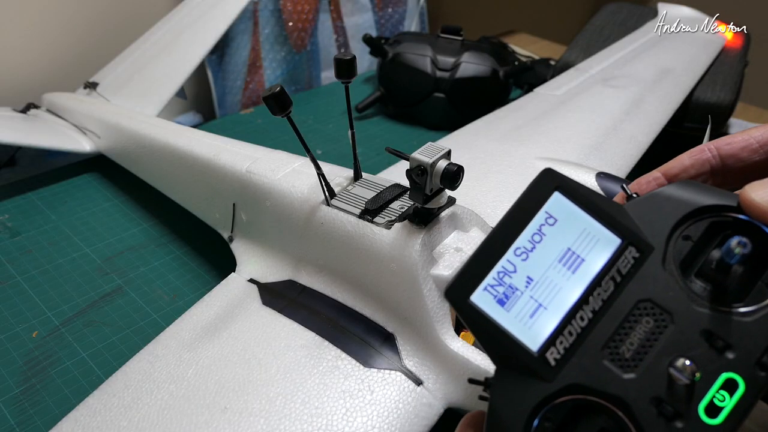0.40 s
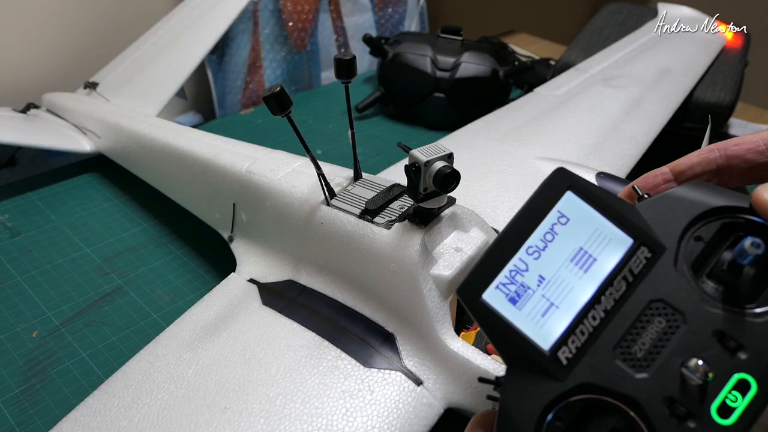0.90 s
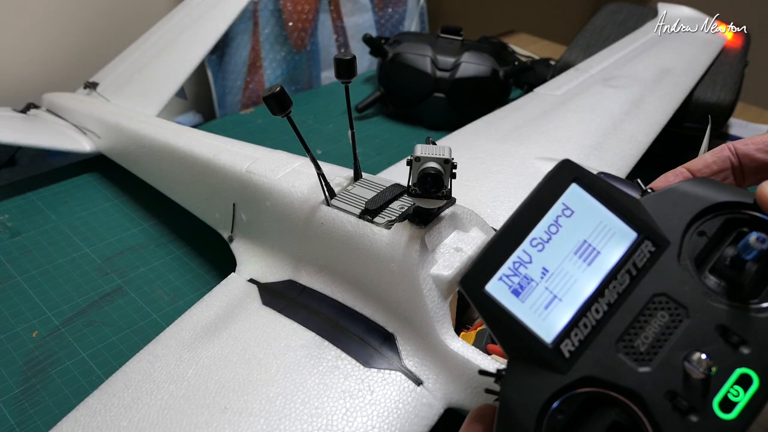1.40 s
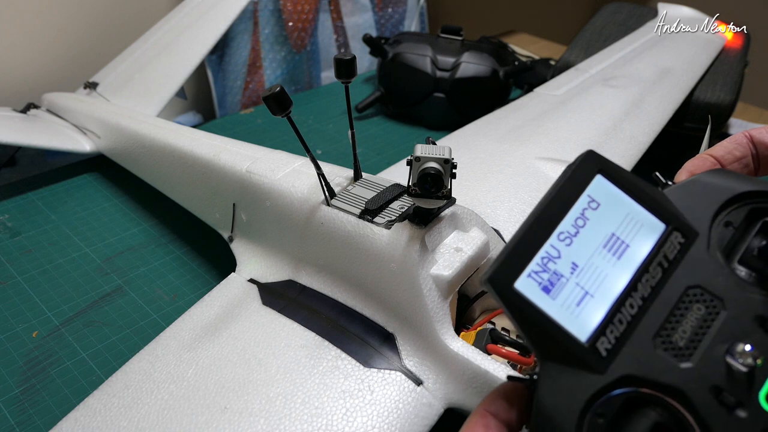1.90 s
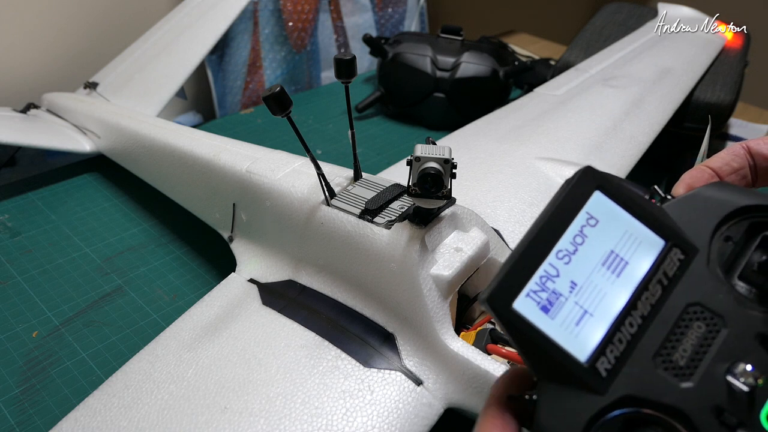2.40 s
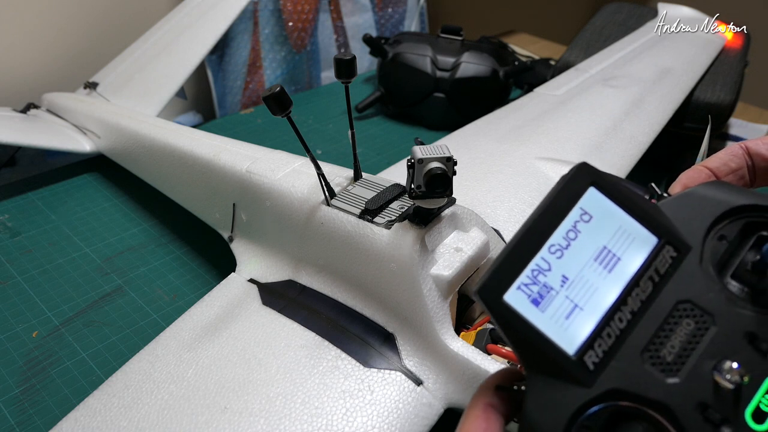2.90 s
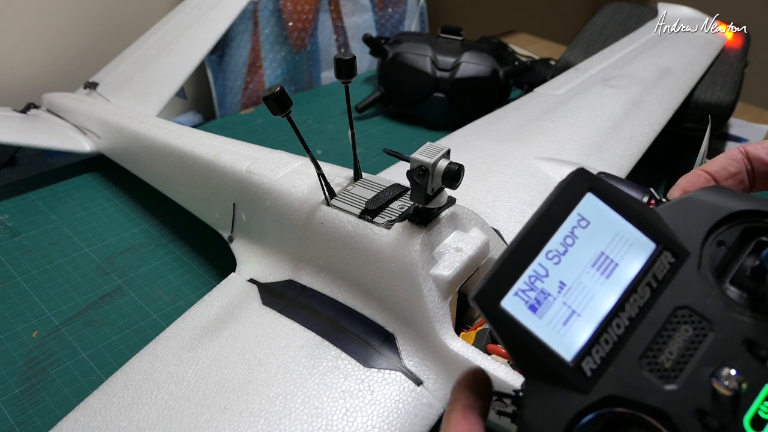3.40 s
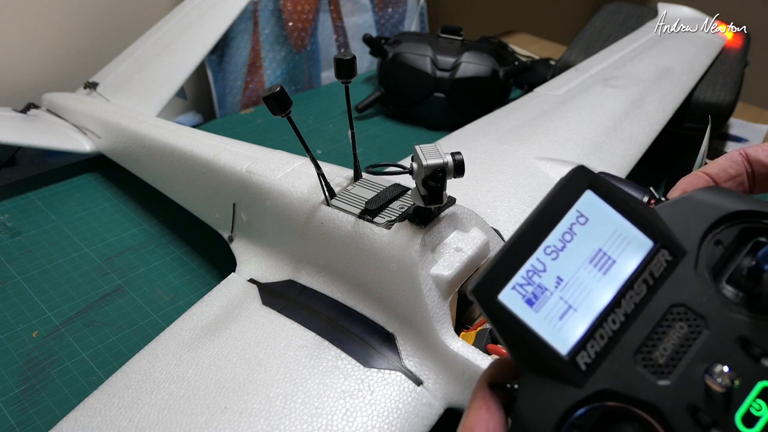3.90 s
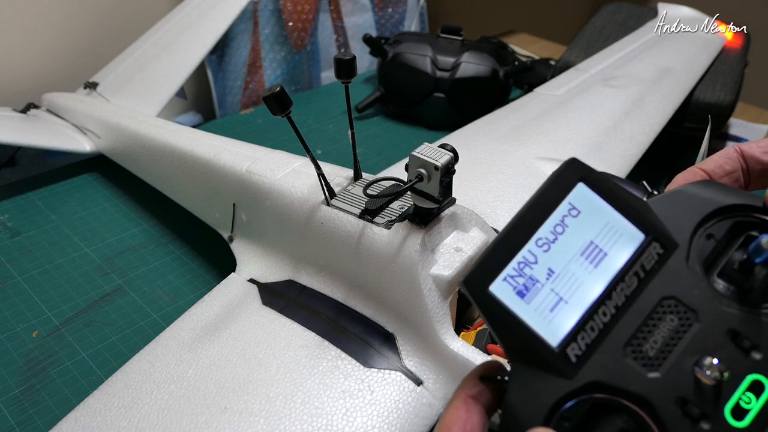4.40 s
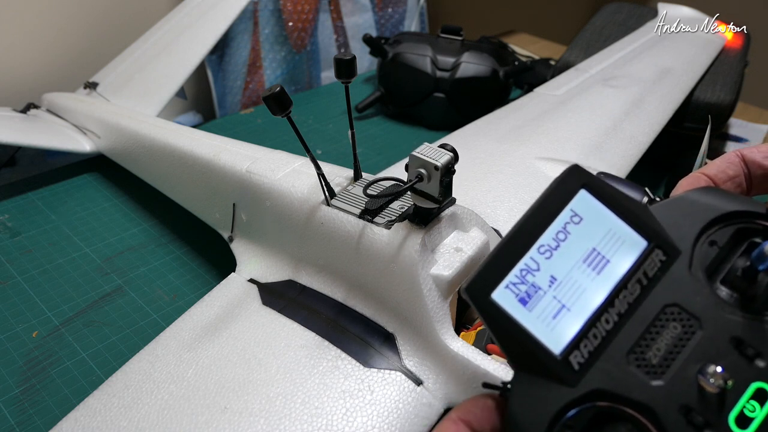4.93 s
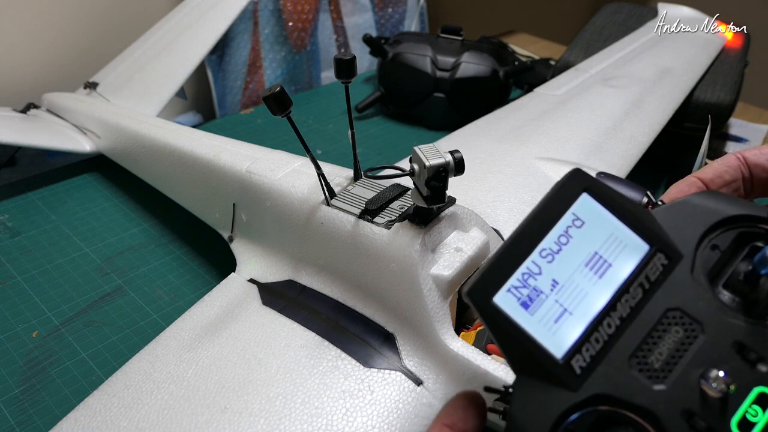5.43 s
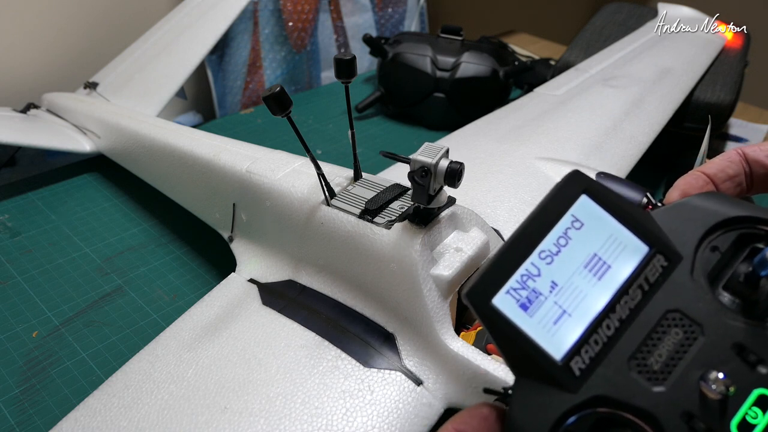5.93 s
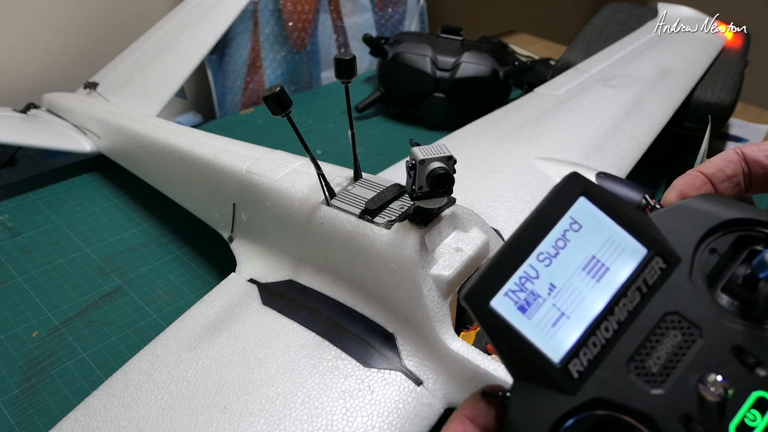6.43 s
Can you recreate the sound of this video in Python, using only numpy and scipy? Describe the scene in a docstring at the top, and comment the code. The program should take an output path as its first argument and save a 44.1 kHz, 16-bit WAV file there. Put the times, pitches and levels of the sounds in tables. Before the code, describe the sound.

Close stereo pickup in a quiet room with a soft wide background noise. A loud, crisp plastic switch click comes first, then a tiny servo gives a brief weak whir. After a pause with faint finger ticks, it runs longer, its buzzing gears growing rattlier and brighter. Another pause, then a third sustained whir that is still running at the end. Short room echoes surround it.

```python
"""Servo pan in a quiet room

A small servo, centred in stereo, pans a camera mount in three runs on a hollow foam body.
Its pinion mesh hums near 900 Hz; loose gears rattle once per motor turn into the case resonances.
A plastic switch snaps once and fingers tick on plastic: noise cracks with short ringing modes.
Dense echoes and a wide filtered background noise lie around it all."""
import sys
import numpy as np
from scipy import signal
from scipy.fft import rfft, irfft
from scipy.io import wavfile

SR = 44100
rng = np.random.default_rng(int(sys.argv[2]) if len(sys.argv) > 2 else 0)


def ratio_of_db(decibels):
    """Turn decibels (scalar or array-like) into linear amplitude factors; 0 dB maps to 1."""
    return 10 ** (np.asarray(decibels, float) / 20)


def bounce(signal):
    """Save signal as a 16-bit WAV file at the path given by the first command-line argument."""
    frames = np.transpose(np.atleast_2d(signal))
    limited = np.clip(frames, -1, 1)
    pcm = np.round(limited * 32767).astype(np.int16)
    wavfile.write(sys.argv[1], SR, pcm)


N = 289296

# drive runs of the servo: start t/s, stop t/s
RUNS = [(0.72, 1.315), (2.714, 4.339), (5.055, 6.6)]
# hardest gear knocks: t/s, relative treble level/dB
KNOCKS = [(0.862, -45), (0.9582, -33), (1.041, -31), (1.083, -28), (1.189, -25), (1.2105, -30),
          (1.2514, -25.5), (1.295, -26), (2.8844, -48), (2.907, -46), (2.941, -34), (3.0418, -35),
          (3.1815, -39), (3.4428, -48), (3.4808, -36), (3.5977, -39), (3.6079, -41), (3.6446, -39),
          (3.652, -28.5), (3.6657, -35), (3.704, -34), (3.715, -40), (3.7247, -40), (3.7618, -35),
          (3.7843, -31), (3.8169, -32), (3.8282, -32), (3.87, -40), (3.8819, -44), (3.9275, -27),
          (3.9382, -26), (3.9899, -26), (4.0245, -25), (4.0453, -43), (4.0854, -34), (4.0962, -30),
          (4.1249, -26), (4.1352, -24), (4.145, -28), (4.251, -24), (4.27, -22), (4.3044, -35),
          (4.3263, -32), (5.1218, -35), (5.1687, -32), (5.196, -29.5), (5.2289, -26), (5.2695, -28),
          (5.3399, -32), (5.3514, -23), (5.3844, -31), (5.3943, -32), (5.4055, -26), (5.4402, -28),
          (5.45, -28), (5.46, -24.5), (5.5059, -31), (5.5167, -28), (5.5491, -31), (5.5587, -26),
          (5.5696, -29), (5.6022, -31), (5.6145, -31), (5.6248, -33), (5.671, -25), (5.6819, -30),
          (5.7021, -33), (5.7142, -29), (5.7256, -30), (5.7591, -32), (5.7709, -29), (5.8266, -28.5),
          (5.8466, -29.5), (5.877, -33), (5.9242, -33), (5.9344, -31), (5.9448, -31), (6.0084, -32.5),
          (6.0633, -30), (6.1017, -31), (6.1139, -29), (6.1264, -31), (6.1646, -25.5), (6.1733, -32),
          (6.218, -35), (6.2287, -29), (6.2603, -34), (6.2709, -28), (6.3071, -31), (6.3175, -32),
          (6.328, -29), (6.3721, -27.5), (6.4214, -28), (6.4317, -37), (6.4431, -24.5), (6.4916, -38),
          (6.5036, -24), (6.5367, -31)]
# case resonances: f/Hz, width/Hz, relative level/dB
CASE = [(1346, 94, 8), (1963, 176, 6.5), (2300, 170, -5.5), (3046, 86, 9), (3190, 63, 5.5),
        (3407, 125, 10.5), (3694, 84, 9.5), (3815, 84, 6.5), (3975, 51, 3), (4280, 98, 3.5), (4972, 170, 4),
        (5400, 125, 8), (5825, 60.4, 4.5), (6020, 120, 7), (6370, 74, -2.5), (6730, 38, 7), (7160, 100, -2),
        (8680, 68, -3), (9080, 116, -4), (9830, 220, -1.5)]
# broad colour of the rattle: f/Hz, gain/dB
RATTLE_COLOUR = [(240, -46), (400, -15), (719, 3), (949, 9.5), (1110, -10.5), (1840, -9), (2470, -17.5),
                 (2970, 0.5), (3690, -10), (4400, -17.5), (4650, -42), (4900, -18.5), (6240, -2.5),
                 (7990, -12.5), (16000, -23.5)]
# borders between the rattle bands: f/Hz
SPLITS_HZ = (2600, 4500, 8000, 11500)
# colour of the bright part of a knock: f/Hz, gain/dB
KNOCK_TREBLE = [(5000, -17.5), (8200, -30), (9000, 2), (11000, -0.5), (13500, -10), (14500, -29),
                (17000, -19)]
# nominal levels as the mount turns, one list a run: t/s, rattle 2.6-4.5 kHz level/dB,
# 4.5-8 kHz and top parts against it level/dB, shell level/dB, whine level/dB
TURNING = [
    [(0.75, -46, -9, -29, -62, -79), (0.78, -54, -9, -29, -61, -79), (0.815, -48, -5, -23, -71, -79),
     (0.85, -65, -11, -28, -63, -80), (0.863, -51.5, -4.5, -18, -59, -76),
     (0.95, -46.5, -5.5, -18, -61, -75), (1.16, -45.5, -2.5, -16, -59, -74),
     (1.2, -40.5, -4.5, -10.5, -53, -70), (1.3, -45, -1, -15, -55, -73)],
    [(2.75, -61, -4, -12, -64, -66), (2.785, -58, 0, -7, -55, -62), (2.83, -50.5, -3, -10.5, -49.5, -58),
     (2.95, -52, -3.5, -16, -53, -58), (3.15, -52, -3.5, -12, -53, -57), (3.52, -47, -4, -17, -51.5, -58),
     (3.62, -42.5, 0.5, -7.5, -45, -58), (3.695, -41, -1.5, -18, -54, -59),
     (3.71, -40.5, -0.5, -8.5, -45, -60), (3.93, -39.5, 0.5, -7.5, -46.5, -55),
     (4.05, -42, 2.5, -1, -48, -56), (4.07, -45, -3, -12, -47, -55), (4.09, -41.5, 4, 1.5, -45, -54),
     (4.13, -40.5, 4.5, -0.5, -49, -53), (4.19, -41.5, 0, -6, -51.5, -63),
     (4.3, -39.5, 1, -2, -44.5, -56.5)],
    [(5.11, -46, 2.5, -10, -50.5, -69), (5.274, -42.5, -5.5, -15.5, -59.5, -70),
     (5.32, -46, -3, -16, -53.5, -72), (5.38, -41, -5.5, -15, -45, -72), (5.7, -41.5, -7.5, -19, -48, -70),
     (5.8, -44, -7.5, -21, -54, -64), (6.0, -46, -6.5, -17, -50, -62), (6.5, -41.5, -6, -14, -52, -60),
     (6.56, -49, 1, -18, -58, -70)],
]
# low shell sound against the shell column: t/s, level/dB
SHELL_HUM = [(0.8, -8.5), (2.85, -10), (3.2, -12.5), (4.2, -12), (4.3, -6.5), (5.1, -6), (5.33, -6.5),
             (5.43, -6), (5.48, -7), (5.55, -7), (5.8, -13.5), (6.56, -9.5)]
# moments when the off-round gear is slackest: t/s
SLACK_S = [1.204, 3.61, 3.717, 3.83, 3.993, 4.14, 4.26, 5.345, 5.452, 5.56, 5.67, 5.714, 5.768, 5.835,
           5.935, 6.06, 6.168, 6.265, 6.372, 6.432, 6.497]
# the motor bogs down and speeds up again, by stretches: t/s, nominal mesh rate f/Hz, relative level/dB
MESH = [
    [(0.74, 900, -52), (0.755, 956, -50), (0.77, 896, -57), (0.786, 799, -57), (0.8, 967, -57),
     (0.822, 947, -61), (0.842, 767, -66), (0.862, 648, -52), (0.878, 949, -55), (0.902, 959, -58),
     (0.936, 783, -57), (0.946, 906, -61), (0.994, 953, -56), (1.01, 796, -63), (1.03, 819, -65)],
    [(1.04, 845, -56), (1.05, 925, -60), (1.11, 925, -53), (1.126, 709, -60), (1.152, 838, -59),
     (1.208, 907, -54), (1.25, 900, -57), (1.272, 943, -51), (1.294, 890, -54), (1.308, 622, -67),
     (1.33, 607, -62)],
    [(2.74, 870, -58), (2.78, 870, -62), (2.79, 596, -62), (2.798, 611, -52), (2.812, 895, -50.5),
     (2.846, 999, -52.5), (2.898, 886, -48), (2.924, 933, -48), (2.938, 809, -46), (2.954, 1003, -54),
     (2.976, 861, -59), (2.992, 865, -51), (3.0, 825, -56)],
    [(3.01, 855, -51), (3.042, 884, -47), (3.05, 985, -52), (3.062, 902, -50), (3.094, 898, -62),
     (3.104, 850, -53.5), (3.156, 1027, -54), (3.164, 935, -46.5), (3.196, 922, -57), (3.214, 987, -51),
     (3.22, 917, -55)],
    [(3.23, 922, -56), (3.246, 992, -51), (3.26, 807, -49), (3.28, 778, -45.5), (3.326, 1017, -59),
     (3.362, 911, -43.5), (3.372, 800, -57), (3.386, 560, -50), (3.405, 640, -51), (3.422, 720, -51),
     (3.432, 793, -49), (3.45, 788, -49)],
    [(3.46, 974, -47), (3.48, 854, -48), (3.492, 965, -50), (3.52, 843.4, -53), (3.552, 972, -45),
     (3.562, 880, -54), (3.58, 640.6, -50), (3.592, 850, -55), (3.624, 929, -48), (3.66, 948, -48),
     (3.672, 695.4, -55), (3.68, 694, -45)],
    [(3.69, 842, -48), (3.706, 863.4, -54), (3.742, 777, -48), (3.752, 944, -48), (3.766, 925, -51),
     (3.776, 801.4, -48), (3.812, 983, -48.5), (3.84, 945, -48), (3.854, 1029, -50), (3.902, 699.4, -51),
     (3.91, 773, -64)],
    [(3.92, 1001, -49), (3.936, 1040, -47), (3.94, 988, -51), (3.982, 934, -51), (3.99, 980, -48),
     (4.02, 927, -57), (4.032, 953, -46.5), (4.054, 941, -59), (4.074, 778.6, -58), (4.084, 910, -40),
     (4.09, 919, -54)],
    [(4.1, 1006, -50), (4.152, 960, -49), (4.16, 901.4, -49), (4.172, 640, -51), (4.182, 602, -48),
     (4.2, 730, -51.5), (4.24, 810, -46.5), (4.25, 969, -51.5), (4.304, 947, -46.5), (4.322, 895, -52),
     (4.346, 581.5, -48), (4.362, 500, -46)],
    [(5.11, 751, -50), (5.138, 891.3, -56), (5.166, 816.5, -52), (5.184, 584.4, -59), (5.21, 566.3, -51),
     (5.23, 947.3, -50), (5.256, 998, -50.5), (5.272, 933, -48), (5.288, 804, -51), (5.298, 621, -53),
     (5.345, 629.5, -50)],
    [(5.355, 957, -53), (5.399, 975, -49), (5.403, 967, -52), (5.411, 840, -57), (5.421, 853, -59),
     (5.429, 942, -51), (5.457, 965, -50), (5.489, 916, -49), (5.497, 795, -57), (5.509, 788, -49),
     (5.52, 770.5, -52)],
    [(5.53, 967, -45), (5.598, 957.5, -51), (5.604, 847, -52), (5.624, 876.5, -51), (5.632, 946, -48.5),
     (5.642, 941.4, -53), (5.652, 845, -55), (5.664, 940, -63), (5.674, 982, -44.5), (5.684, 979, -44.5),
     (5.7, 972, -56)],
    [(5.71, 915.6, -56), (5.714, 880, -52), (5.752, 882, -51), (5.758, 808, -49), (5.778, 910, -53),
     (5.79, 679, -51.5), (5.822, 687, -55), (5.832, 907, -54), (5.848, 989.7, -53), (5.884, 965, -48),
     (5.9, 768, -56)],
    [(5.91, 875, -44.5), (5.92, 832, -51), (5.928, 942.5, -50), (5.952, 921, -51), (5.96, 782, -48.5),
     (5.998, 778, -56), (6.008, 890, -47), (6.038, 944, -60), (6.074, 927, -47.5), (6.084, 700, -51),
     (6.1, 756, -51)],
    [(6.11, 923, -58), (6.122, 784, -45), (6.14, 769, -60), (6.17, 974, -47), (6.186, 987, -52),
     (6.2, 825, -52), (6.22, 858, -59), (6.226, 955, -52), (6.282, 876, -52), (6.288, 792, -47),
     (6.3, 804, -51)],
    [(6.31, 958, -56), (6.34, 836, -48), (6.38, 921.6, -50), (6.39, 753.5, -51), (6.448, 934, -57),
     (6.46, 759.5, -50), (6.476, 965, -58), (6.496, 805, -53), (6.514, 967.6, -49), (6.532, 847, -51),
     (6.55, 650, -59)],
]
# switch snap and finger ticks: t/s, relative level/dB, softness 0-1
TICKS = [(0.1468, -33, 0.95), (1.46, -37, 0.85), (2.402, -36, 0.8), (2.4048, -31, 0.85),
         (2.4515, -31, 0.85), (2.456, -40, 0.9), (0.6211, -7, 0.), (0.6082, -33, 1), (0.611, -35, 1),
         (0.62, -18, 0.), (0.624, -15, 0), (0.63, -22, 0.3)]
# ringing modes of the plastic: f/Hz, relative level/dB
PLASTIC = [(1400, -7.5), (2000, -35), (2900, -8.5), (3500, -6.5), (4600, -6), (5700, -36), (6650, -1.5),
           (7800, -7.5), (9900, -7), (12000, -49)]
# colour of the noise crack: f/Hz, gain/dB
CRACK = [(180, -50), (600, -34), (1300, -20), (2100, -24), (3240, -14.5), (5550, -6), (6670, -24),
         (8580, -2.5), (9980, -2.5), (15200, -6), (16500, 14)]
# low ring of the switch housing, against the snap: f/Hz, level/dB, T60/s
THUMP = [(120, -54, .02), (435, -38, 0.02), (720, -29, 0.021)]
# colour of the switch as the walls return it: f/Hz, gain/dB
SWITCH_ECHO = [(180, -69), (300, -46), (900, -16), (1480, -2), (1900, -10), (2840, -2.5), (4460, 1),
               (10500, -4.5), (15700, -22), (16500, -45)]
# width (side signal) of the direct snap: f/Hz, gain/dB
SNAP_WIDTH = [(300, -4), (600, 4), (1500, -6), (2500, -12), (6000, -26), (16000, -4)]
# width (side signal) of the room echoes: f/Hz, gain/dB
ECHO_SIDE = [(100, 8), (400, 0.5), (1000, -1.5), (2400, 2), (4400, -16.5), (8000, -23), (15000, 0)]
# background noise over time, with some servo sound in it during the runs: t/s, relative level/dB
BACKGROUND = [(0.0, -58), (0.78, -60.5), (1.24, -58.5), (3.78, -57), (3.98, -54.5), (4.26, -54),
              (4.75, -57.5), (5.35, -56), (6.38, -56), (6.56, -55)]
# centre spectrum of the background: f/Hz, relative level/dB
BACKGROUND_MID = [(15, -52), (25, -13.5), (53, -25), (76, -11.5), (170, -8.5), (263, -3), (416, -5),
                  (659, -9.5), (840, -5.5), (936, -13.5), (1230, -9.5), (1520, -14), (2990, -19.5),
                  (8590, -18.5), (16000, -28)]
# width spectrum of the background: f/Hz, relative level/dB
BACKGROUND_SIDE = [(15, -79), (25, -19), (48, -22), (141, -7), (256, -2.5), (373, -4.5), (416, -4.5),
                   (734, -9), (1040, -12), (3520, -29), (5280, -32.5), (9070, -32.5), (16000, -41)]
# faint background tones: f/Hz, width/Hz of each of two passes, level/dB
BACKGROUND_TONES = [(83.3, 3.4, -76.5), (121.6, 6.9, -71), (261.3, 14.4, -70), (875, 66, -64),
                    (15570, 150, -69)]

ATTACK_S, RELEASE_S = 0.058, 0.016   # fades of a run
COAST_S = .045   # fade of the mesh tone after the drive stops
GEAR_HZ, THROB_DB = 18.17, 1.5   # nominal turns/s of the off-round gear; the rattle swells at its slack
MOTOR_TURNS = 5   # nominal motor turns per turn of the off-round gear
LOW_DB, LOW_FOLLOWS = -53.5, 0.57   # low rattle when the rattle is at -43 dB; share of its swing
TREBLE_DB, TREBLE_FOLLOWS = 2.5, 0.76   # treble against the rattle; share of the top part's swing
KNOCK_DB, KNOCK_FOLLOWS = 15.5, 0.38   # ordinary knocks against the rattle; share of the top part's swing
KNOCK_CASE_DB, KNOCK_LOW_CUT_HZ = -7.5, 2300   # knock noise that drives the case
SLACK_DB, KNOCK_SPREAD_DB = 4.5, 1.8   # half the drop of knocks outside the slack; chance spread
# while the load holds the gears snug they barely rattle
SNUG_START_S, SNUG_END_S, SNUG_SHARE, SNUG_KNOCK_DB = 2.7, 3.52, .45, -8
WOBBLE_RAD, WOBBLE_DEPTH, HUNT_SHARE = .55, .35, .02   # pinion bend and pump; random speed hunting
TEETH_DB, OCTAVE_DB = -16, -10.5   # mesh overtones into the case; second harmonic of the mesh tone
CRUISE_HZ, HUM_DB_PER_HZ = 945, 0.0269   # steady mesh rate; low shell sound rises as the mesh slows
GAP_HZ, GAP_WIDTH_HZ, GAP_SHARE = 4650, 350, .75   # the case radiates little here; share removed
SHELL_LOW, SHELL_HIGH = (555, 90), (970, 160)   # foam shell resonances: f/Hz, width/Hz
WHINE_HZ = 15550
THUD_S, THUD_DB, THUD_HZ, THUD_WIDTH_HZ = 4.0815, -29, 1550, 450
PLASTIC_T60_S = .007
# the servo fills mostly the bench corner, the loud snap the whole room
ROOM_DB, NEAR_T60_S, FAR_T60_S = -6, 0.28, 0.5
FAR_DB = -9.5   # share of the servo that reaches the whole room
TOP_HZ = 15980   # the steep low-pass is 60 dB down here


def rms_one(x):
    """Scales a signal to unit rms."""
    return x / np.sqrt(np.mean(x ** 2) + 1e-20)


def in_time(rows):
    """Columns joined by straight lines, one value per sample."""
    s, *columns = np.transpose(rows)
    return np.array([np.interp(np.arange(N) / SR, s, c) for c in columns])


def in_step(t, rate, marks_s):
    """Turns at about the given rate, whole at every marked moment."""
    free = rate * np.asarray(marks_s)
    whole = np.cumsum(np.round(np.diff(free, prepend=0)))
    return rate * t + np.interp(t, marks_s, whole - free)


def colour(x, points):
    """Causal (minimum-phase) filter with the given (f/Hz, gain/dB) shape."""
    hz, db = np.transpose(points)
    shape = np.interp(np.log(np.arange(4097) * SR / 8192 + 1), np.log(hz), db)
    cepstrum = irfft(np.log(ratio_of_db(shape)))
    cepstrum[1:4096] *= 2   # fold onto the causal half
    cepstrum[4097:] = 0
    return signal.fftconvolve(x, irfft(np.exp(rfft(cepstrum))))[:N]


def resonance(x, hz, width_hz):
    """Two-pole peak with gain 1 on top."""
    r = np.exp(-np.pi * width_hz / SR)
    poles = [1, -2 * r * np.cos(2 * np.pi * hz / SR), r * r]
    return signal.lfilter([(1 - r * r) / 2, 0, (r * r - 1) / 2], poles, x)


def resonance_twice(x, hz, width_hz):
    """Two equal peaks in series, for steeper skirts."""
    return resonance(resonance(x, hz, width_hz), hz, width_hz)


def drift(rate):
    """Slow chance with spread 1."""
    r = np.exp(-2 * np.pi * rate / SR)
    return rms_one(signal.lfilter([1], [1, -2 * r, r * r], rng.standard_normal(N + SR))[SR:])


def burst(clicks, rise_s, decay_s):
    """Each click opens an envelope of about its own height that rises fast and dies away."""
    a, b = np.exp(-1 / (rise_s * SR)), np.exp(-1 / (decay_s * SR))
    return signal.lfilter([1 - a], np.convolve([1, -a], [1, -b]), clicks + 1e-18)


def servo():
    """Gear rattle and teeth drive case and shell; mesh tone, knocks, whine and one thud join them."""
    rattle_db, upper_db, top_db, shell_db, whine_db = in_time([row for run in TURNING for row in run])
    mesh_hz, mesh_db = in_time([row for stretch in MESH for row in stretch])
    t = np.arange(N) / SR
    gear = 2 * np.pi * in_step(t, GEAR_HZ, SLACK_S)
    snug = (t > SNUG_START_S) * np.clip((SNUG_END_S - t) / .08 + 1, 0, 1)

    # three motor turns in five fall in the slack and knock hard
    slack_db = SLACK_DB * (np.clip(2 * np.cos(gear) + .5, -1, 1) - 1)
    knock_db = rattle_db + KNOCK_DB + KNOCK_FOLLOWS * top_db + slack_db
    rattle_db = rattle_db + THROB_DB * np.cos(gear) + .8 * drift(8.0)
    low_db = LOW_DB + LOW_FOLLOWS * (rattle_db + 43.0) - rattle_db
    treble_db = TREBLE_DB + TREBLE_FOLLOWS * top_db
    dull, sharp, knock_env, ticking, turns = gear_rattle(knock_db + SNUG_KNOCK_DB * snug, snug)

    wobble = 2 * np.pi * turns + 1.5 * drift(12)
    hunting_hz = mesh_hz * (1 + HUNT_SHARE * drift(50))
    phase = 2 * np.pi * np.cumsum(hunting_hz) / SR + WOBBLE_RAD * np.sin(wobble)
    teeth = ratio_of_db(TEETH_DB) * rms_one(sum(np.cos(k * phase) for k in range(2, 8)))

    sway = [ratio_of_db(1.3 * drift(20)) for k in range(7)]   # resonances swell and fade as the mount turns
    case = through_case(rms_one(dull) + teeth, sway)
    bright = through_case(sharp, sway)
    high_pass = signal.butter(2, KNOCK_LOW_CUT_HZ, "high", fs=SR, output="sos")
    thin = signal.sosfilt(high_pass, rng.standard_normal(N))
    body = knock_env * through_case(thin, sway) + ratio_of_db(-10.5) * ticking
    edges = [1050, *SPLITS_HZ, 17000]
    band_db = [low_db, 0, upper_db, treble_db, top_db]
    for a, b, db, x in zip(edges[:-1], edges[1:], band_db, [case, case, case, bright, bright]):
        band = signal.sosfilt(signal.butter(3, [a, b], "band", fs=SR, output="sos"), x)
        body += ratio_of_db(rattle_db + db) * rms_one(band)

    hum_db = shell_db + in_time(SHELL_HUM)[0] + HUM_DB_PER_HZ * (CRUISE_HZ - mesh_hz)
    body += ratio_of_db(whine_db) * whine() + ratio_of_db(hum_db) * shell_rumble(dull) + thud()
    return drive(t, RELEASE_S) * body + drive(t, COAST_S) * mesh_tone(phase, mesh_db, wobble)


def drive(t, fade_s):
    """Each run swells in on a squared ramp and fades after its stop."""
    return sum(np.clip((t - a) / ATTACK_S, 0, 1) ** 2 * np.clip(1 + (b - t) / fade_s, 0, 1) ** 2
               for a, b in RUNS)


def gear_rattle(knock_db, snug):
    """Noise beaten once per motor turn: dull and sharp rattle, knock envelope, bright ticks, turns."""
    s, hard_db = np.transpose(KNOCKS)
    hard = (s * SR).astype(int)
    turns = in_step(np.arange(N) / SR, GEAR_HZ * MOTOR_TURNS, s)   # hard knocks fall on whole turns
    at = np.flatnonzero(np.diff(turns // 1))
    beats, knocks = np.zeros((2, N))
    beats[at] = ratio_of_db(2.5 * rng.standard_normal(N)[:len(at)])
    knocks[at] = ratio_of_db(knock_db[at] + KNOCK_SPREAD_DB * rng.standard_normal(N)[:len(at)])
    knocks[hard[:, None] + np.arange(-9, 9)] = 0   # a hard knock replaces the ordinary one
    knocks[hard] = ratio_of_db(hard_db)
    treble = rms_one(colour(rng.standard_normal(N), KNOCK_TREBLE))
    ticking = burst(knocks, 0.00021, 0.0035) * treble
    knocks *= ratio_of_db(KNOCK_CASE_DB + 1.2 * drift(30))
    noise = rng.standard_normal(N)
    loose = 1 - (1 - SNUG_SHARE) * snug
    # the treble follows each beat more tightly
    sharp = (.28 + .37 * snug + loose * burst(beats ** 1.5, .0002, .0022)) * noise
    dull = (.12 + .35 * snug + loose * burst(beats, .001, .0032)) * noise
    return dull, sharp, burst(knocks, 0.0012, 0.003), ticking, turns


def through_case(x, sway):
    """Case resonances over a broad rattle colour, with a gap where the case radiates little."""
    rings = np.zeros(N)
    for k, (hz, width_hz, db) in enumerate(CASE):
        mode = resonance(x, hz, np.clip(width_hz, 50, 400))
        rings += (-1) ** k * ratio_of_db(db) * sway[k % 7] * mode
    both = rms_one(rings) + ratio_of_db(-3.5) * rms_one(colour(x, RATTLE_COLOUR))
    return both - GAP_SHARE * resonance(both, GAP_HZ, GAP_WIDTH_HZ)


def mesh_tone(phase, mesh_db, wobble):
    """Tooth-contact tone and octave, pumped once a motor turn by the off-centre pinion."""
    tone = np.sin(phase) + ratio_of_db(OCTAVE_DB) * np.sin(2 * phase)
    mesh = ratio_of_db(mesh_db) * tone * (1 + WOBBLE_DEPTH * np.cos(wobble)) * ratio_of_db(1.0 * drift(60))
    return 1.5 * mesh + .25 * resonance(mesh, *SHELL_HIGH)


def shell_rumble(rattle):
    """The rattle through the low resonance of the foam shell, narrow then broad."""
    return rms_one(resonance(resonance(rattle, *SHELL_LOW), SHELL_LOW[0], 360))


def whine():
    """Noise narrowed by two peaks into a thin high whine."""
    return rms_one(resonance_twice(rng.standard_normal(N), WHINE_HZ, 220))


def thud():
    """A dull bump in the body: one short burst of resonant noise."""
    click = 1. * (np.arange(N) == int(THUD_S * SR))
    noise = rms_one(resonance(rng.standard_normal(N), THUD_HZ, THUD_WIDTH_HZ))
    return ratio_of_db(THUD_DB) * noise * burst(click, 0.00099, 0.0022)


def ticks():
    """Noise crack and ringing plastic modes, soft touches duller; returns direct and room-bound sound."""
    s, db, soft = np.transpose(TICKS)
    at = (s * SR).astype(int)
    shares = np.array([1 - soft, soft])   # hard and soft parts of each touch
    clicks = np.zeros((2, N))
    clicks[:, at] = ratio_of_db(db) * shares
    crack = burst(clicks, 0.00019, 0.00059) * rng.standard_normal(N)
    out = ratio_of_db(8.0) * np.array([colour(c, CRACK) for c in crack])
    spread = rng.standard_normal((len(at), len(PLASTIC)))
    for k, (hz, level_db) in enumerate(PLASTIC):
        clicks[:, at] = ratio_of_db(db + level_db + 1.5 * spread[:, k]) * shares
        r, w = ratio_of_db(-60 / (PLASTIC_T60_S * SR)), 2 * np.pi * hz / SR
        poles = [1, -2 * r * np.cos(w), r * r]
        out += signal.lfilter([np.sin(w) / 2, 0, -np.sin(w) / 2], poles, clicks + 1e-18)
    clicks[0, at] = ratio_of_db(db) * (1 - soft)
    for hz, level_db, t60 in THUMP:
        r, w = ratio_of_db(-60 / (t60 * SR)), 2 * np.pi * hz / SR
        poles = [1, -2 * r * np.cos(w), r * r]
        out[0] += ratio_of_db(level_db) * signal.lfilter([0, np.sin(w)], poles, clicks[0] + 1e-18)
    clicks[0, at] = ratio_of_db(db + 16.5)
    softened = signal.sosfilt(signal.butter(3, 9000, fs=SR, output="sos"), out[1])
    return out[0] + softened, colour(clicks[0], SWITCH_ECHO)


def room(x, t60):
    """Dense echoes dying away, unrelated in centre and width."""
    t = np.arange(int(.6 * SR)) / SR
    tails = rng.standard_normal((2, len(t))) * ratio_of_db(-60 * t / t60) * (t > .004)
    mid, side = [ratio_of_db(ROOM_DB) * signal.fftconvolve(x, tail / np.linalg.norm(tail))[:N] for tail in tails]
    return np.array([mid, colour(side, ECHO_SIDE)])


def background():
    """Noise of changing level, separate in centre and width, with a few faint wavering tones."""
    white = rng.standard_normal((3, N))
    level = ratio_of_db(in_time(BACKGROUND)[0])
    mid = level * ratio_of_db(4.0) * rms_one(colour(white[0], BACKGROUND_MID))
    for hz, width_hz, db in BACKGROUND_TONES:
        mid += ratio_of_db(db) * rms_one(resonance_twice(white[2], hz, width_hz))
    return np.array([mid, level * ratio_of_db(11.5) * rms_one(colour(white[1], BACKGROUND_SIDE))])


def scene():
    """Servo in the centre; the switch has unequal sides, and echoes and background spread to both."""
    motor = servo()
    switch, echoed = ticks()
    near = room(motor, NEAR_T60_S)
    far = room(echoed + ratio_of_db(FAR_DB) * motor, FAR_T60_S)
    mid, side = near + far + background()
    side += colour(switch, SNAP_WIDTH)
    panned = switch * ratio_of_db(np.array([[-1.5], [1.2]]))   # left, right level/dB
    return motor + panned + mid + side * np.array([[1], [-1]])


def top_cut(x):
    """Nothing passes above the cut-off."""
    return signal.sosfilt(signal.butter(12, 17140, fs=SR, output="sos"), x)


def record(dry):
    """A steep low-pass cuts the top of the stereo mix."""
    low_pass = signal.cheby2(16, 60, TOP_HZ, fs=SR, output="sos")
    mix = signal.sosfilt(low_pass, dry)
    return top_cut(mix)


dry = scene()
out = record(dry)
bounce(out)
```